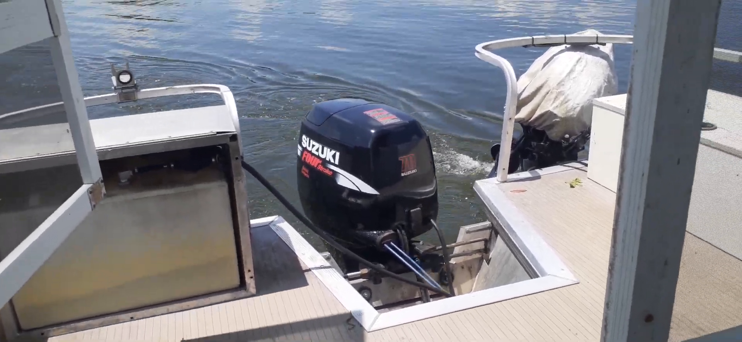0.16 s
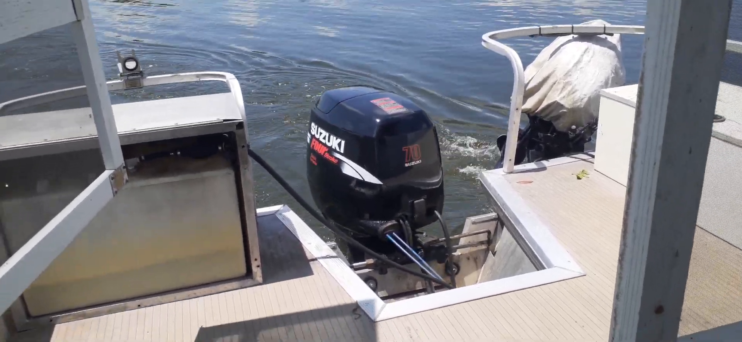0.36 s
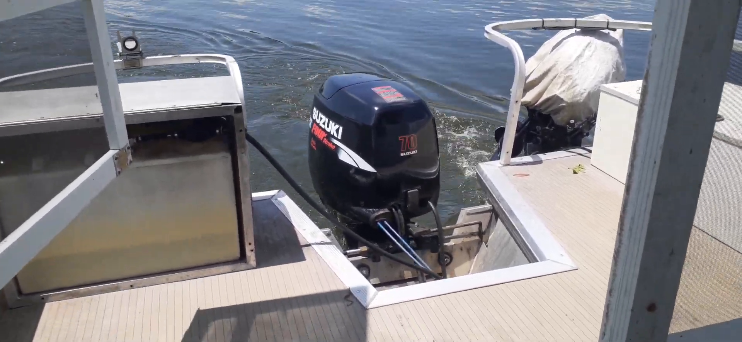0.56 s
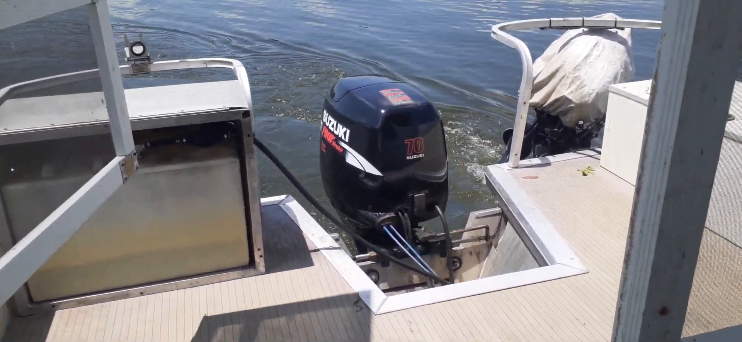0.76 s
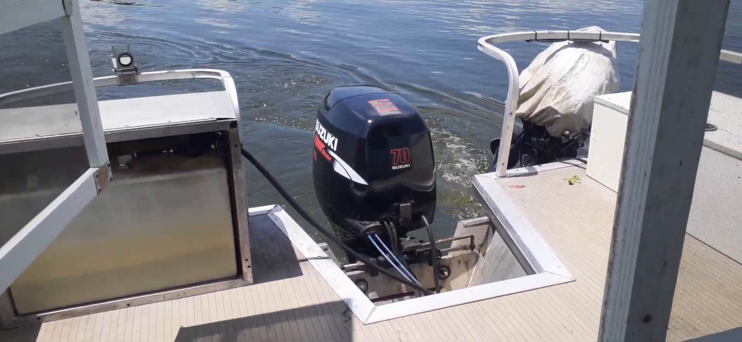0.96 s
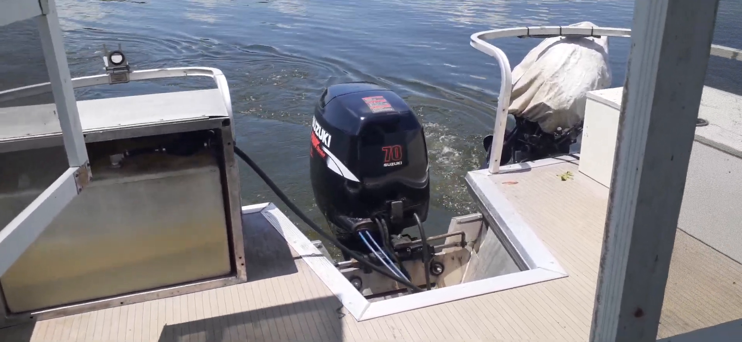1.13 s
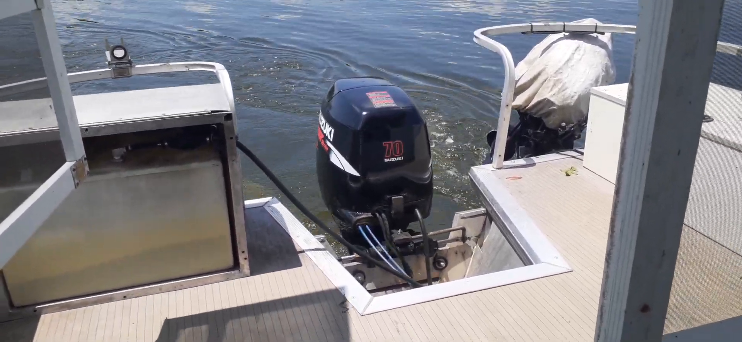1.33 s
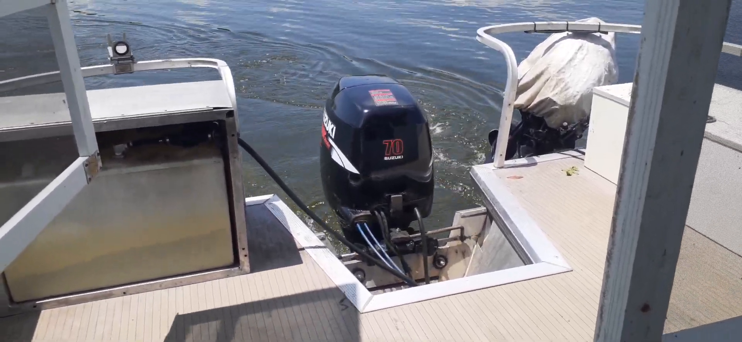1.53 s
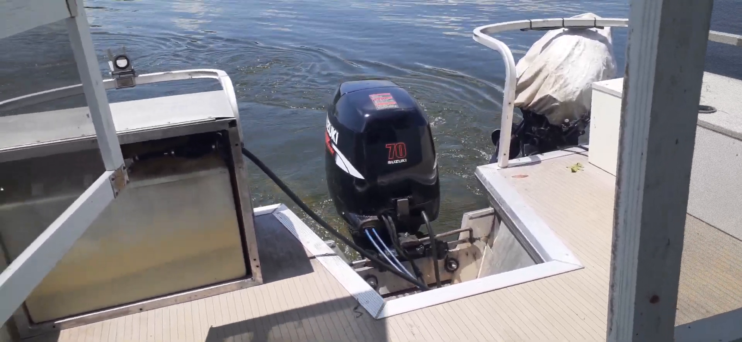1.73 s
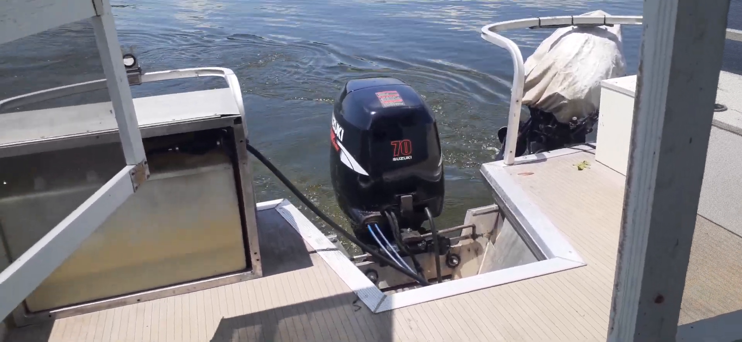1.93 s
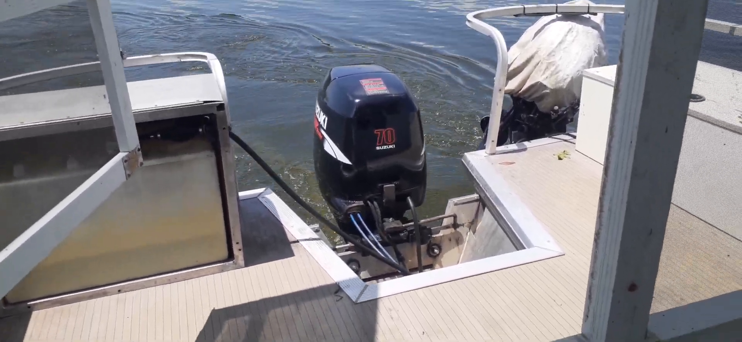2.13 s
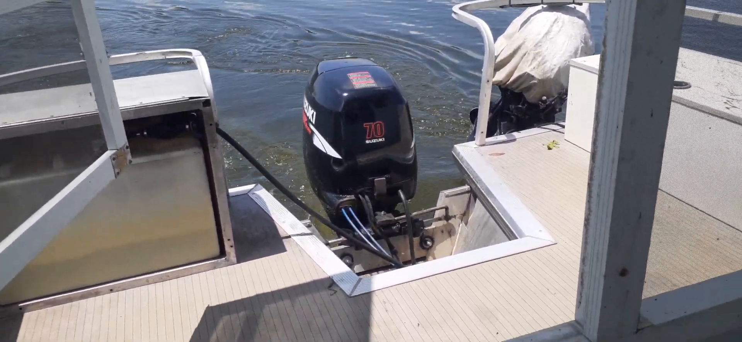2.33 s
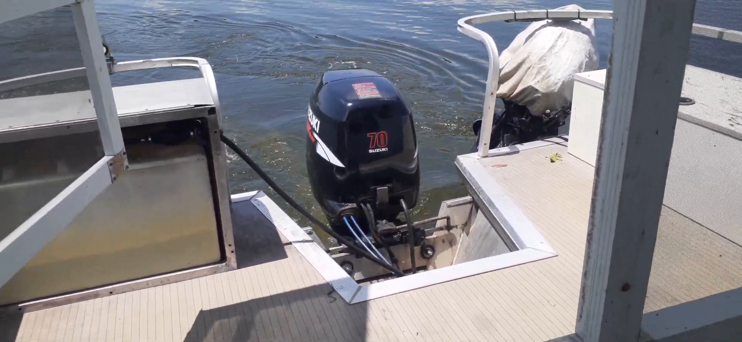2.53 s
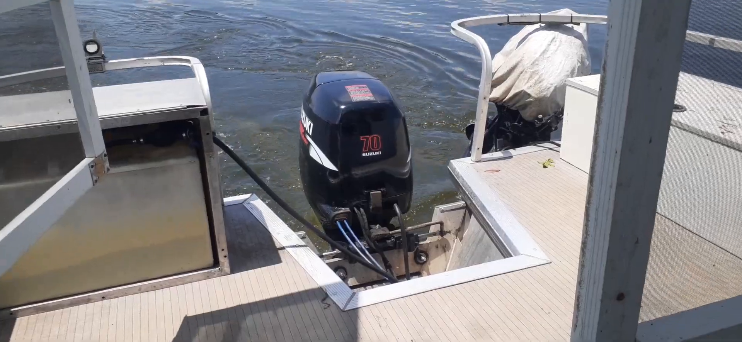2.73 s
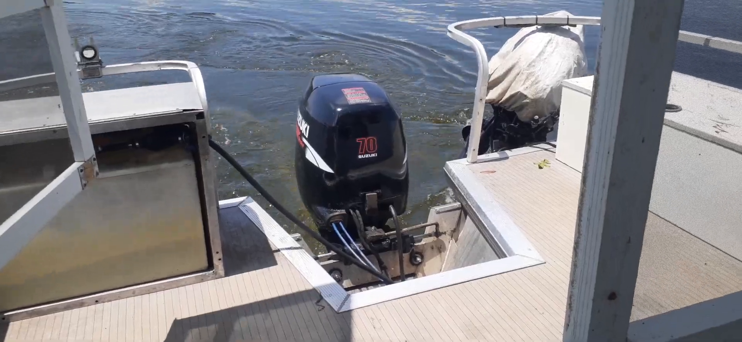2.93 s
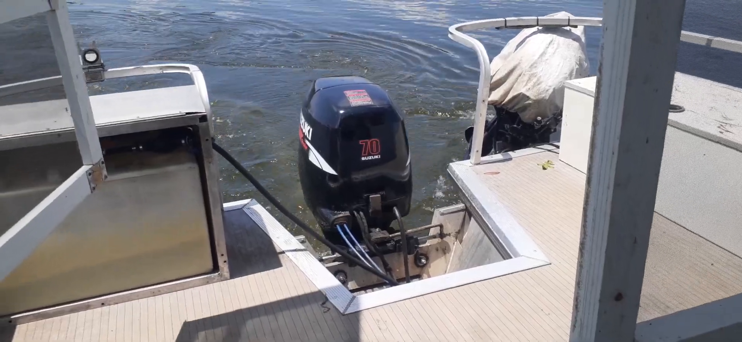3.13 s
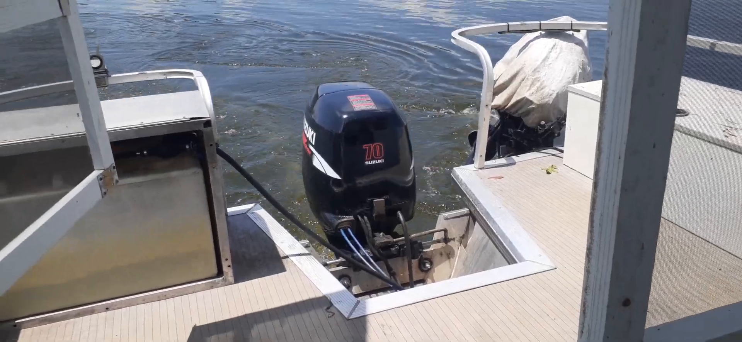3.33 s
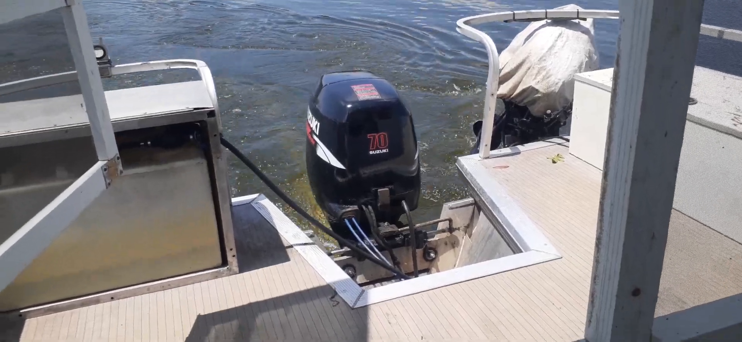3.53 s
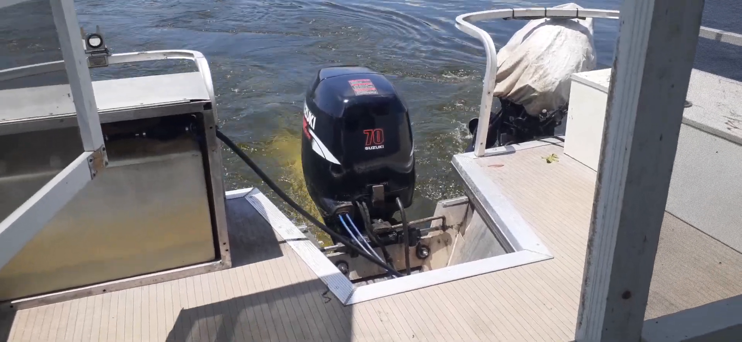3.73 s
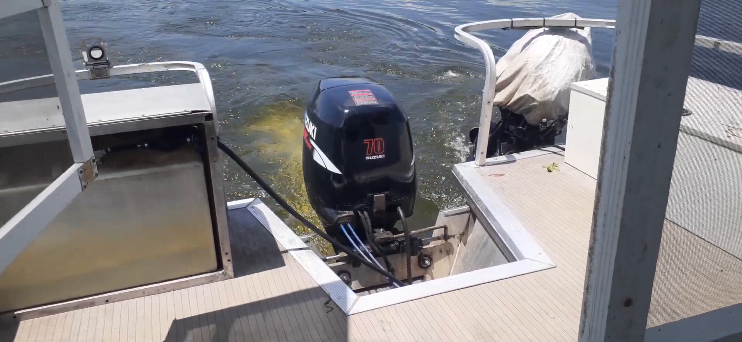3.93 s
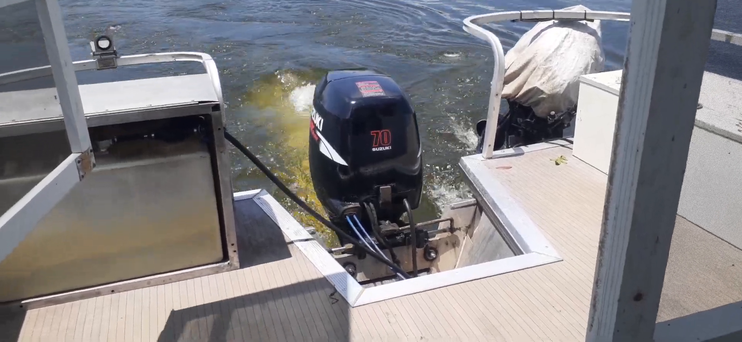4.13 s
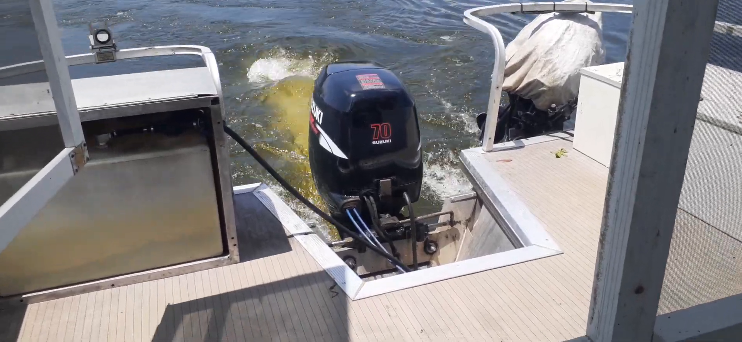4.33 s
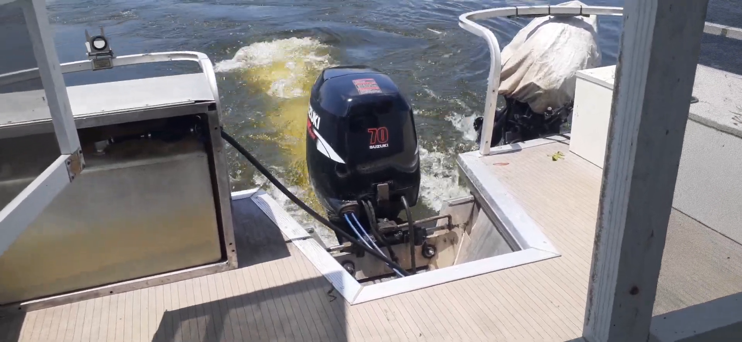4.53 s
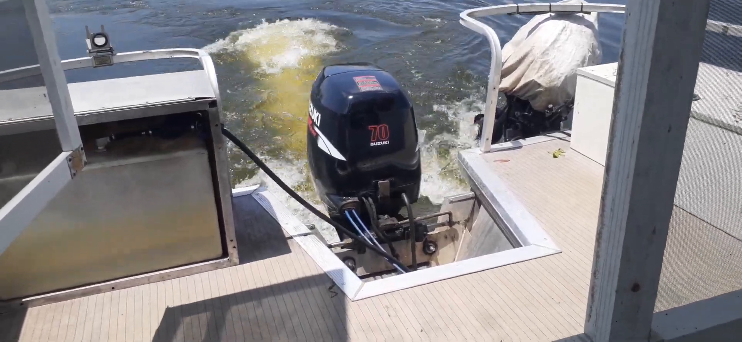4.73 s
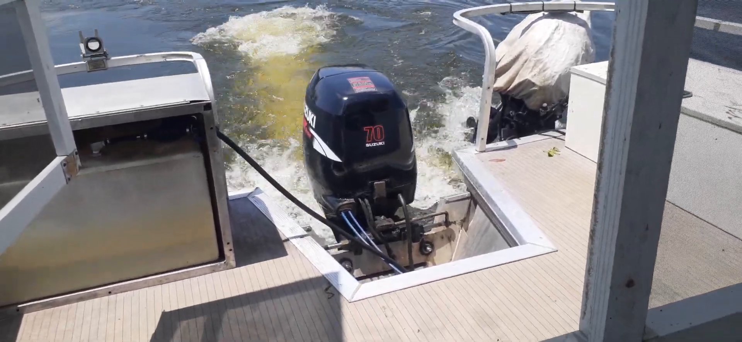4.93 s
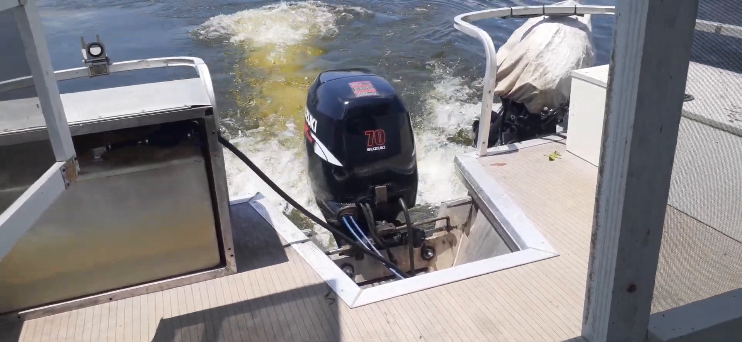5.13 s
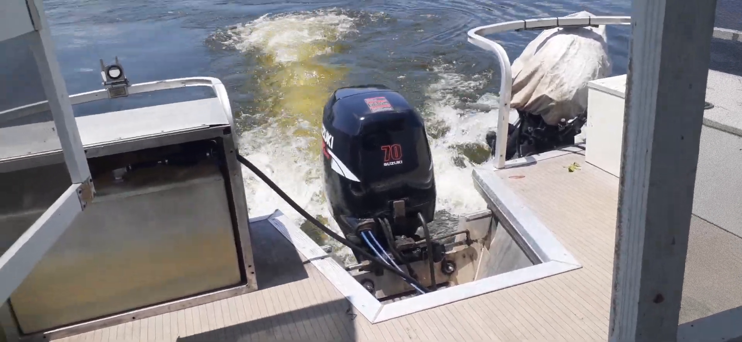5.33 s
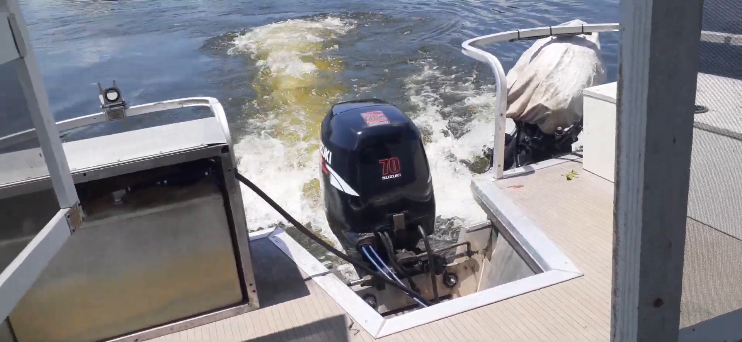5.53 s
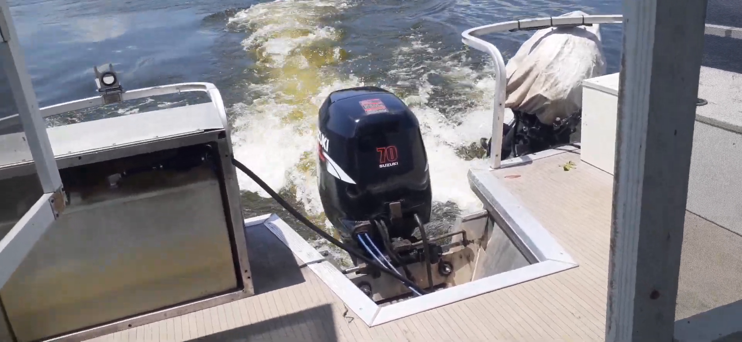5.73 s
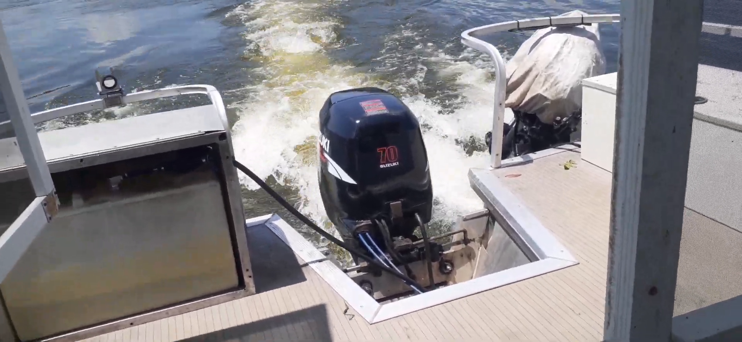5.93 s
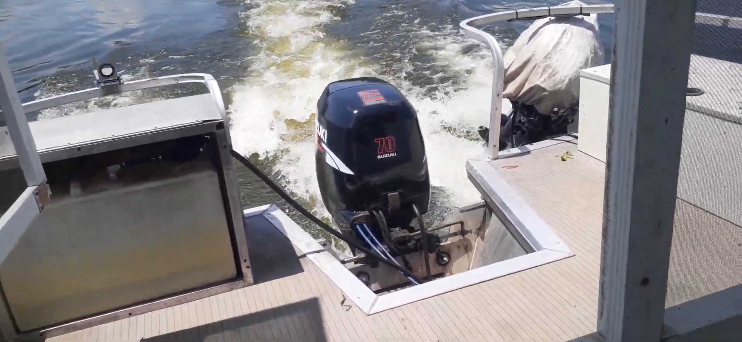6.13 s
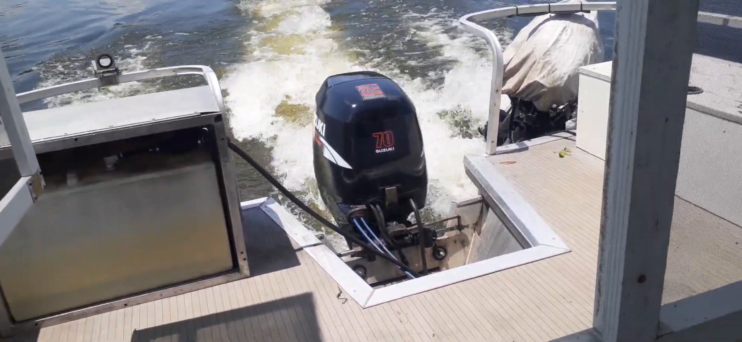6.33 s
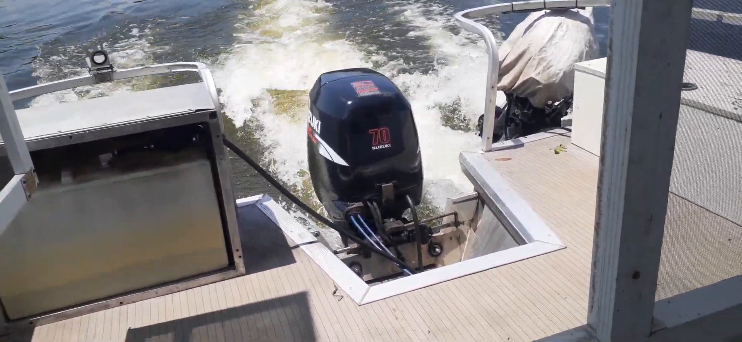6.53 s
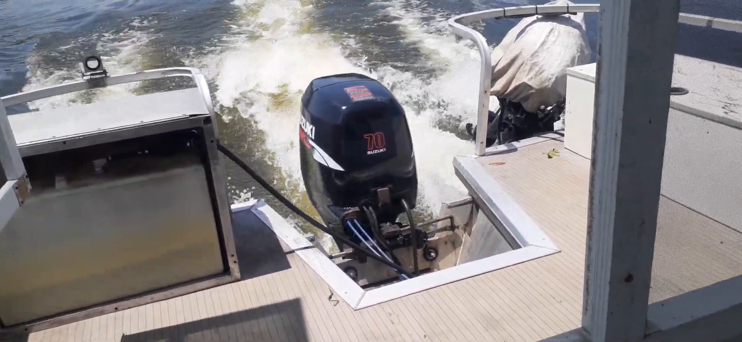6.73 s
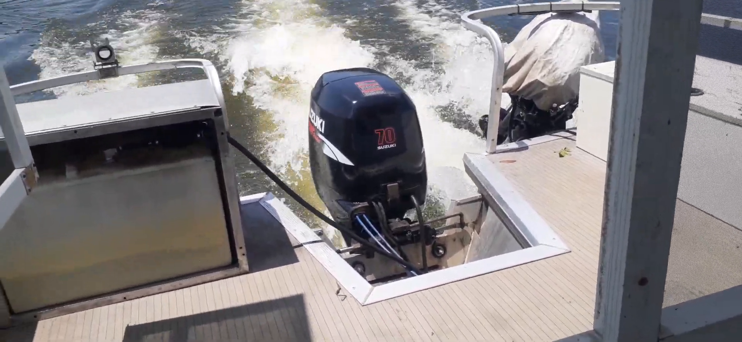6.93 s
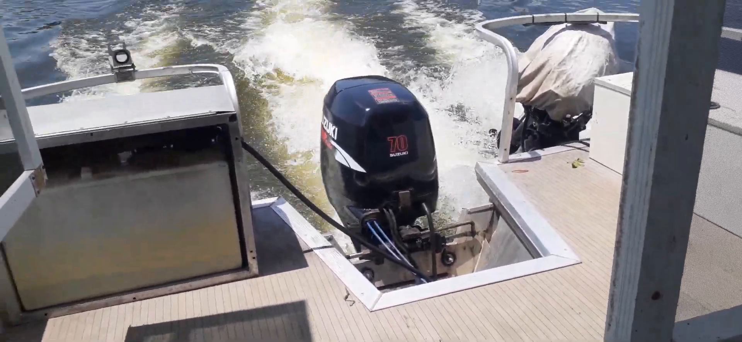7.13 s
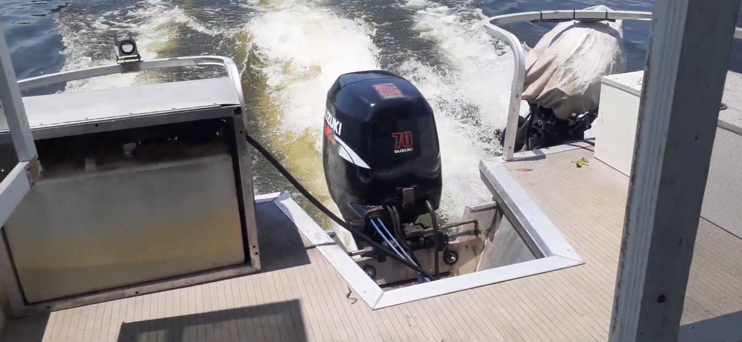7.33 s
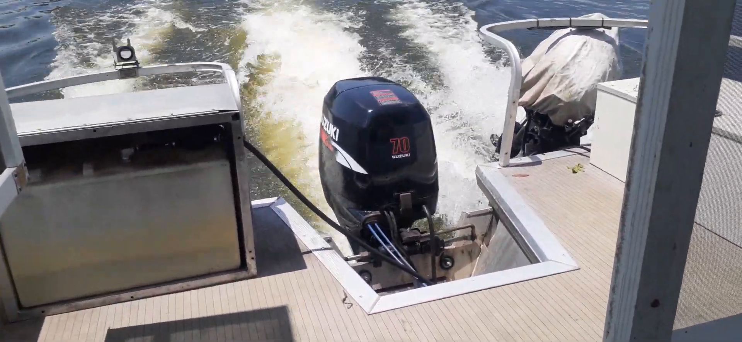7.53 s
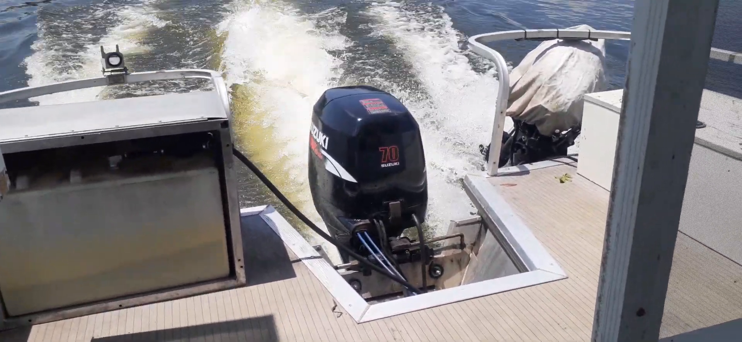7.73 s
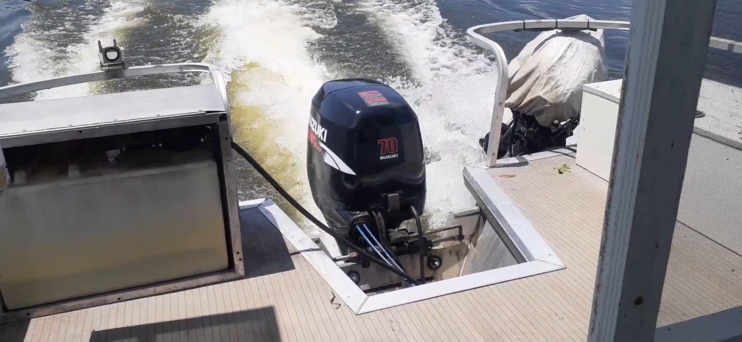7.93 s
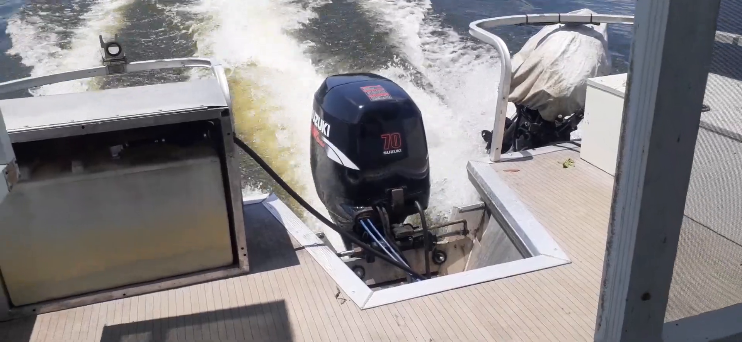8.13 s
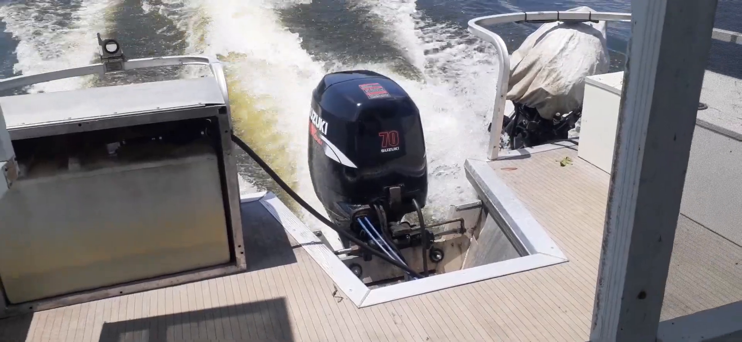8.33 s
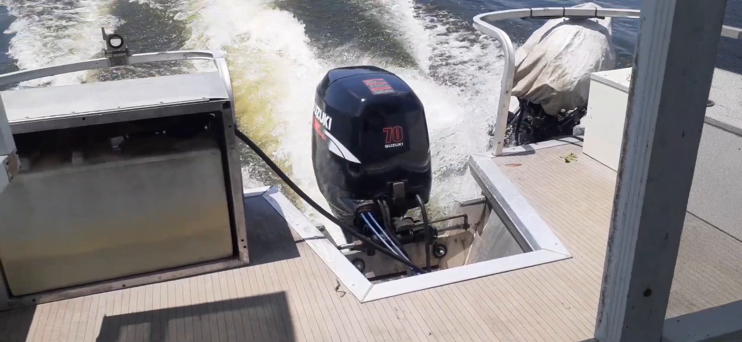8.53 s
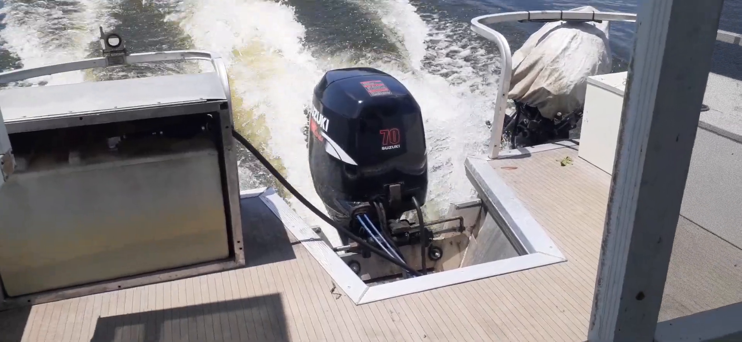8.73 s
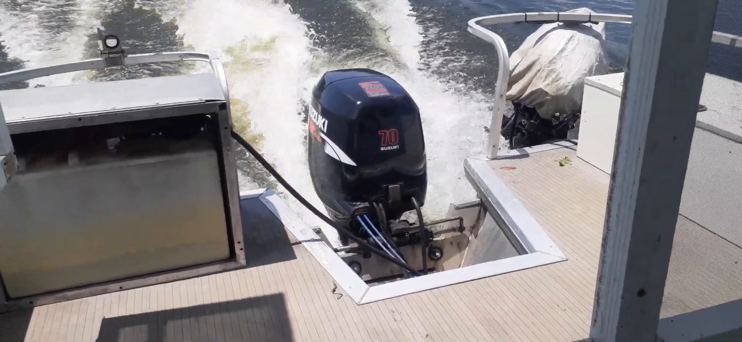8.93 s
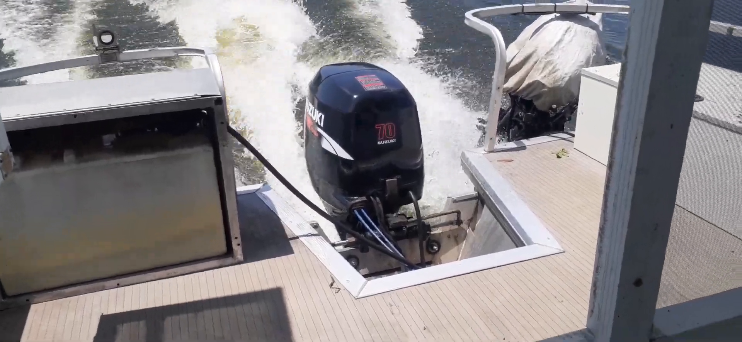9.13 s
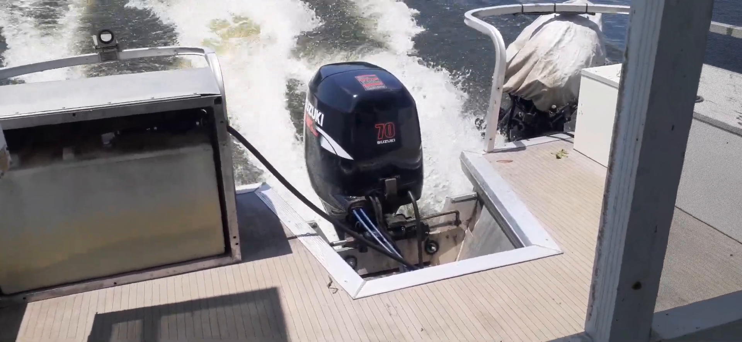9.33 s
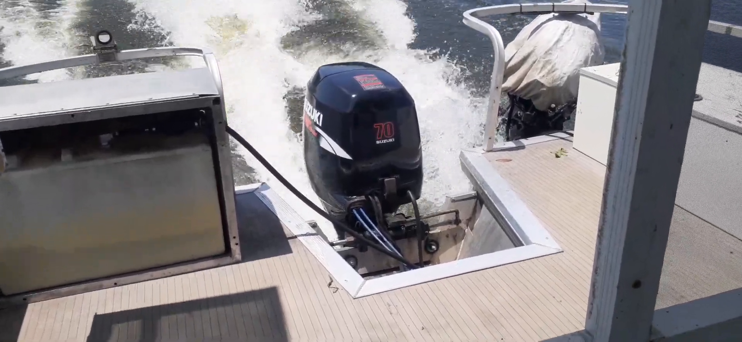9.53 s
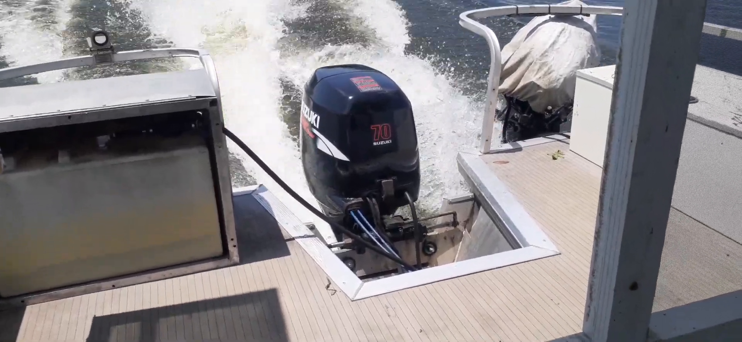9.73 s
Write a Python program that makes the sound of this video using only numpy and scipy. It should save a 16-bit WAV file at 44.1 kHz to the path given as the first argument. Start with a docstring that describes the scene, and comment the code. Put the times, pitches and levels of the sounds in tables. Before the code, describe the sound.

Heard from a boat's deck, a softly chugging outboard opens up and climbs in speed, with rushing water and slaps on the hull.

```python
"""The low chug of a four-cylinder outboard idling, heard from the deck of a metal boat, with a stereo
microphone facing the stern. After three seconds the motor opens up and climbs in speed. The exhaust booms
through water and hull, the block clatters and sizzles under its cowl, and a loose panel buzzes at some
speeds. The wake grows behind the boat and water slaps the hull, over a light rumble of wind."""
import sys
import numpy as np
from scipy import signal
from scipy.fft import rfft, irfft, next_fast_len
from scipy.io import wavfile

SR = 44100
rng = np.random.default_rng(int(sys.argv[2]) if len(sys.argv) > 2 else 0)


def wav_record(signal):
    """Record a signal, one row per channel, as 16-bit PCM in the file named by sys.argv[1]."""
    frames = np.transpose(np.atleast_2d(signal))
    bounded = np.clip(frames, -1, 1)
    # unit amplitude maps onto the largest positive 16-bit level
    quanta = np.round(bounded * 32767).astype(np.int16)
    wavfile.write(sys.argv[1], SR, quanta)


N = 435266

# Resonances of the motor's cowl. Each row: pitch in Hz, nominal width in Hz, level in dB.
COWL_MODES = [(627.6, 37, -2), (775, 65, -1), (894, 81, -2), (1300, 290, -7.5), (1490, 85, -14.5),
              (2310, 310, -17.5), (4040, 660, -17), (7460, 400, -19)]


def from_db(db):
    """Decibels to gain."""
    return np.exp(np.asarray(db) * (np.log(10) / 20))


def rms_one(x):
    """Scales to rms 1."""
    return x / np.sqrt(np.mean(x ** 2) + 1e-20)


def in_time(rows):
    """Rows led by a time in seconds become one curve per further column, a value per sample."""
    seconds, *columns = np.transpose(rows)
    return [np.interp(np.arange(N) / SR, seconds, column) for column in columns]


def at_hz(points, hz):
    """Reads a table on a log-frequency axis."""
    points_hz, values = np.transpose(points)
    return np.interp(np.log(hz), np.log(points_hz), values)


def drift(rate_hz):
    """Slow random wander of rms 1."""
    r = np.exp(-80 * np.pi * rate_hz / SR)
    slow = signal.lfilter([1], [1, -2 * r, r * r], rng.standard_normal(N // 40 + 2002))[2000:]
    return np.interp(np.arange(N) / 40, np.arange(len(slow)), rms_one(slow))


def resonate(x, hz, width):
    """Two-pole resonance, gain 1 at its peak."""
    r = np.exp(-np.pi * width / SR)
    feedback = [1, -2 * r * np.cos(2 * np.pi * hz / SR), r * r]
    return signal.lfilter((1 - r * r) / 2 * np.array([1, 0, -1]), feedback, x)


def resonate_twice(x, hz, width):
    """Two passes through one resonance, for steeper flanks."""
    return resonate(resonate(x, hz, width), hz, width)


def body(drive, modes):
    """A shaken structure: steep resonances in parallel, signs alternating; rms 1."""
    return rms_one(sum((-1) ** k * from_db(db) * rms_one(resonate_twice(drive, hz, 1.17 * width))
                       for k, (hz, width, db) in enumerate(modes)))


def spread(mid, side, hz):
    """Left and right at rms 1: low sounds sit in the centre, high ones wide."""
    return rms_one(mid + np.clip(hz / 4000, 0, 1) * side * [[1], [-1]])


def banded_noise(spectrum, pan, flicker_db):
    """Third-octave bands of stereo noise, each with its own level, flicker, side and width; rms 1."""
    # How alike the microphone's sides are. Each row: frequency in Hz, correlation from 0 to 1.
    likeness = [(150, 1), (300, 0.85), (550, 0.8), (950, 0.69), (1500, 0.1), (2400, 0.11), (6000, 0.09),
                (15000, 0.09)]
    out, shared_flicker = np.zeros((2, N)), drift(5.0)
    edges_hz = 160 * 2 ** np.arange(0, 6.9, 1 / 3)
    white = rng.standard_normal((2, 2, N))
    for k, (low, high) in enumerate(zip(edges_hz, edges_hz[1:])):
        band = signal.butter(2, [low, high], "band", fs=SR, output="sos")
        mid, side = signal.sosfilt(band, white[k % 2])
        hz = np.sqrt(low * high)
        alike = np.clip(at_hz(likeness, hz), 0, 1)
        gain = from_db(at_hz(spectrum, hz) + flicker_db * (0.46 * shared_flicker + drift(17.0)))
        balance = from_db(at_hz(pan, hz) / 2 * np.array([[1], [-1]]))
        mid, side = gain * np.sqrt(1 + alike) * mid, gain * np.sqrt(1 - alike) * side
        out += balance * [mid + side, mid - side]
    return rms_one(out)


def firing_clicks(firings, uneven_db):
    """One click per firing, its strength set by cylinder and by chance."""
    # Each entry: one cylinder's strength in dB.
    cylinder_db = [-1.5, 1.5, -2.5, 0]
    count = np.floor(firings).astype(int)
    chance_db = uneven_db * rng.standard_normal(count[-1] + 1)[count]
    return np.diff(count, prepend=0) * from_db(np.take(cylinder_db, count % 4) + chance_db)


def firing_swell(firings, depth):
    """A gain that jumps at each firing, then dies away."""
    return 1 - depth + depth * 2.4 * np.exp(-2.5 * (firings % 1))


def wind():
    """Light, lumpy wind rumble, different on each side of the microphone."""
    band = signal.butter(2, [25, 90], "band", fs=SR, output="sos")
    rumble = signal.sosfilt(band, rng.standard_normal((2, N)))
    return from_db(-50 + 5.0 * drift(1.2)) * rms_one(rumble)


def thin_tones():
    """Thin tones swell and fade in the background: noise through narrow resonances."""
    # Each row: start and end in seconds, pitch in Hz, nominal width in Hz, level in dB.
    tones = [(0.125, 0.34, 4300, 40, -58), (0.498, 1.35, 3590, 61, -59.5), (2.6, 3.15, 4540, 50, -58.5),
             (1.3, 1.8, 11960, 121, -48.5), (1.85, 3.1, 11900, 89.5, -56), (3.101, 3.24, 796, 30, -42),
             (3.287, 3.4, 903, 37, -42), (3.334, 3.44, 1298, 46, -43), (3.39, 3.48, 534, 29.9, -34.5),
             (4.997, 5.7, 10100, 69.95, -62), (6.3, 9.2, 11830, 60, -55), (6.75, 7.8, 1100, 36, -44.5),
             (7.403, 8.1, 2447, 65, -53)]
    # Eight fainter, high ones come and go by chance during the idle.
    faint = [(2 * a, 2 * a + .4 + b, 9700 + 2800 * c, 80, -63) for a, b, c in rng.random((8, 3))]
    out = np.zeros((2, N))
    for start, end, hz, width, level_db in tones + faint:
        i, j = round(start * SR), round(end * SR)
        mid, side = resonate_twice(rng.standard_normal((2, j - i)), hz, width)
        swell = np.sin(np.linspace(0, np.pi, j - i)).clip(0) ** 0.23
        out[:, i:j] += from_db(level_db) * spread(mid, side, hz) * swell
    return out


def gurgle(wake_db):
    """Air pockets in the wake burst in clumps and ring for a few cycles."""
    sizes = from_db(2.3 * np.minimum(rng.exponential(1, N), 5)) * rng.choice([-1, 1], N)
    bursts = rng.random(N) < 400 * from_db(5.0 * drift(5.0)) / SR
    pitches_hz, pitch_index = np.geomspace(230, 1500, 14), rng.integers(0, 14, N)
    pops = sum(resonate(sizes * bursts * (pitch_index == k) + 1e-18, hz, hz / 4.7) * (500 / hz) ** 0.96
               for k, hz in enumerate(pitches_hz))
    return from_db(wake_db - 12.0) * rms_one(pops)


def wake(firing_hz):
    """Water churns and gurgles astern; the fine spray comes up fully only at speed."""
    # Each row: time in seconds, level in dB.
    levels = [(0, -44.5), (2, -47.5), (3.1, -44.5), (3.45, -33), (4, -31.5), (4.7, -32.5), (5.8, -27.5),
              (6.6, -29.5), (8, -28.5), (9.87, -27)]
    # Each row: frequency in Hz, relative spectral density in dB.
    spectrum = [(200, 3), (300, 0.5), (600, -1.5), (1000, -4), (1700, -14.5), (2500, -18), (4000, -22),
                (7000, -22.5), (10000, -25), (15800, -22.5)]
    # Each row: frequency in Hz, left minus right in dB.
    pan = [(60, -12), (180, 6.5), (550, 1.5), (1650, 4), (4970, 0), (15000, 2)]
    wake_db, = in_time(levels)
    churn = banded_noise(spectrum, pan, flicker_db=1.0)
    spray = churn - signal.sosfilt(signal.butter(1, 5000, fs=SR, output="sos"), churn)
    spray_cut = 0.35 * np.clip((127 - firing_hz) / 12, 0, 1)
    return from_db(wake_db) * (churn - spray_cut * spray) + gurgle(wake_db)


def ticks_and_slaps():
    """Ticks on the motor are short puffs of noise; slaps of water on the hull last longer and knock."""
    # Each row: start in seconds, level in dB, pitch in Hz.
    hits = [(0.31, -24, 5000), (1.195, -35, 10980), (6.427, -19, 390), (7.009, -21, 440),
            (7.063, -15.5, 402), (7.356, -26, 365.3), (7.381, -19, 594), (7.605, -15, 643),
            (8.397, -24, 345), (8.493, -21, 411), (8.701, -22, 310), (9.188, -22, 320),
            (9.4425, -14.5, 631), (9.448, -22, 900), (9.485, -14.5, 1234), (9.515, -18.5, 690)]
    out, t = np.zeros((2, N)), np.arange(3000) / SR
    for start, level_db, hz in hits:
        width = np.maximum(0.11 * hz, hz ** 2 / 5000)
        mid, side = resonate(rng.standard_normal((2, len(t))), hz, width)
        puff = spread(mid, side, hz) * np.exp(-t / (0.0082 + 3.1 / hz))
        knock = np.clip(1 - hz / 4000, 0, 1) * np.sin(2 * np.pi * hz * t) * np.exp(-t * hz / 2.0)
        i = round(start * SR)
        out[:, i:i + len(t)] += from_db(level_db) * (1.45 * knock + 0.18 * puff)
    return out


def panel_buzz(firings):
    """In four set spells a loose panel on board taps once per firing and rasps in between."""
    # Each row: start, loudest moment and end in seconds, rasp at its loudest and at the end in dB,
    # tilt of the rasp in dB per octave, taps at their loudest in dB.
    spells = [(3.115, 3.36, 3.46, -45, -48, 9, -41), (3.562, 3.68, 3.98, -26.5, -32.5, -5, -26),
              (4.951, 5.1, 5.26, -34.5, -38.5, -5.5, -32.5), (6.079, 6.161, 6.32, -35, -37, 2.5, -58)]
    # Each row: pitch in Hz, nominal width in Hz, level in dB.
    panel_modes = [(336, 34, 7), (414, 35, -1), (641, 34, -2.5), (834, 19, -1), (1090, 75, -2.5)]
    out, t = np.zeros((2, N)), np.arange(N) / SR
    pulsing_noise = firing_swell(firings, depth=0.2) * rng.standard_normal((2, N))
    clicks = firing_clicks(firings, uneven_db=4.0)
    for start, loudest, end, top_db, end_db, tilt_db, taps_db in spells:
        i, j = round((start - .1) * SR), round((end + .1) * SR)
        hz = np.maximum(np.fft.rfftfreq(j - i, 1 / SR), 900)
        rasp = irfft(rfft(pulsing_noise[:, i:j]) * from_db(tilt_db * np.log2(hz / 1000)), j - i)
        taps = from_db(taps_db - top_db) * body(clicks[i:j], panel_modes)
        swell = np.interp(t[i:j], [start - .03, start + 0.026, loudest, end - .01, end + 0.014],
                          from_db([-200, top_db - 4.0, top_db, end_db, -200]))
        out[:, i:j] += swell * (rms_one(rasp) + taps)
    return signal.sosfilt(signal.butter(2, 260, "high", fs=SR, output="sos"), out)


def sizzle(firing_hz, sizzle_db):
    """Soft, high sizzle from under the cowl, a little to the left; its centre shifts with speed."""
    # Each row: centre in Hz, nominal width in Hz, then relative level in dB at each of three speeds.
    bands = [(10400, 500, -5.5, -12, -26), (11170, 440, -10, 1, -9), (11870, 770, 0, -12, -10),
             (12350, 370, -3.5, -11, -2.5)]
    # Those three speeds, in firings per second.
    speeds_hz = [36, 118.8, 131.4]
    out = 0
    for hz, width, *by_speed_db in bands:
        band = rms_one(resonate_twice(rng.standard_normal((2, N)), hz, width))
        out = out + from_db(np.interp(firing_hz, speeds_hz, by_speed_db) + 1.2 * drift(2.5)) * band
    return from_db(sizzle_db) * from_db([[1.5], [-1.5]]) * out


def housing_whine(firings, firing_hz):
    """The twelfth multiple of the firing rate sings while it crosses a housing resonance."""
    in_tune = 1 / (1 + ((12 * firing_hz - 1665) / 30) ** 2)
    gain = from_db(-49.0 + 1.72 * drift(5.9)) * in_tune
    return gain * np.sin(2 * np.pi * 12 * firings + 0.78 * drift(2.9))


def cowl_growl(firings, firing_hz, growl_db):
    """Firings ring the cowl, just left of centre: a multiple stands out as it passes a resonance."""
    kicks = firing_clicks(firings, uneven_db=2.0) * np.sqrt(SR / firing_hz)
    return from_db(growl_db) * body(kicks, COWL_MODES[:4]) * from_db([[1.0], [-1.0]])


def valve_clatter(firings, clatter_db):
    """Valve gear and chain: noise swelling at each firing, with the cowl ringing along."""
    # Each row: frequency in Hz, relative spectral density in dB.
    spectrum = [(200, 8.5), (300, 8), (500, 1.5), (800, -3.5), (1100, -2), (1500, -8), (2000, -20.5),
                (3500, -15), (6000, -18), (9000, -17.5), (12000, -12), (15800, -25)]
    # Each row: frequency in Hz, left minus right in dB.
    pan = [(60, 0.5), (180, 0.5), (550, 1.8), (1650, 7.6), (4970, 0.33), (15000, 1.5)]
    cowl = sum(from_db(db) * rms_one(resonate_twice(rng.standard_normal(N), hz, 1.37 * width))
               for hz, width, db in COWL_MODES)
    clatter = banded_noise(spectrum, pan, flicker_db=2.0) + from_db([[-7], [-9]]) * cowl
    return from_db(clatter_db) * firing_swell(firings, depth=0.13) * clatter


def hull_and_deck(firings, firing_hz, throb_db, drum_db):
    """Firings and churned water, calmer at idle, make the hull throb and the deck drum underfoot."""
    # Each row, in both: pitch in Hz, nominal width in Hz, level in dB.
    hull_modes = [(46, 46, -27), (70.2, 17, -4), (104.2, 18, -7), (130.2, 37, -9)]
    deck_modes = [(165.6, 23, 0.5), (215, 29.5, 4), (350, 29, -18), (390, 42, -2), (448.6, 15, -1.5)]
    kicks = firing_clicks(firings, uneven_db=1.0) * np.sqrt(SR / firing_hz)
    water = np.interp(firing_hz, [35, 60], [0.4, 1.1]) * rng.standard_normal(N)
    drive = 0.56 * kicks + water
    throb = from_db(throb_db) * body(drive, hull_modes)
    drumming = from_db(drum_db + 0.4 * drift(2.1)) * body(drive, deck_modes)
    return throb + drumming


def exhaust(firings, firing_hz, boom_db):
    """A boom at the firing rate, with overtones; at idle strong and weak firings alternate and chug."""
    # The boom dips briefly. Each row: time in seconds, depth in dB.
    dips = [(4.519, 4), (5.334, 20), (7.856, 4), (8.132, 4), (8.21, 4.5), (8.34, 3), (8.51, 4.5), (8.6, 5),
            (8.81, 3.5), (9.13, 1), (9.22, 2)]
    # Each row: multiple of the firing rate, idle level in dB, firing rate in Hz up to which that holds,
    # level under load in dB, flutter under load in dB.
    overtones = [(2, -33, 40, -37, 2.5), (3, -36, 40, -44.5, 2), (4, -43, 38, -52.5, 3.5),
                 (6, -37, 68, -55, 1.5), (7, -59, 40, -58.5, 1.5)]
    # The boat's resonances lift a loaded overtone. Each row: centre in Hz, width in Hz, lift in dB.
    lifts = [(92, 12, 13), (164.4, 7.4, 5), (223.3, 4.4, 12.5), (246.7, 19.9, 5), (299.4, 25, 4.5),
             (326.5, 12, 10.5), (404, 21, 8.5), (440, 29, 11), (633.4, 67, 21), (696, 20, 10),
             (795, 51.6, 12), (890, 44.6, 19)]
    t, speeds_hz = np.arange(N) / SR, np.arange(30., 160)
    idle = np.clip((60 - firing_hz) / 25, 0, 1)
    chug_db = idle * (2.0 * np.cos(np.pi * firings + 1.6 * drift(2.4)) + np.cos(np.pi * firings / 2))
    dip_db = sum(np.interp(t, [s - 0.028, s, s + 0.028], [0, db, 0]) for s, db in dips)
    partials = [(1, boom_db - dip_db)]
    for multiple, idle_db, holds_hz, load_db, flutter_db in overtones:
        load = np.clip((firing_hz - holds_hz) / 7.0, 0, 1)
        lift_db = sum(db / (1 + (2 * (multiple * speeds_hz - hz) / width) ** 2)
                      for hz, width, db in lifts)
        loaded_db = load_db + np.interp(firing_hz, speeds_hz, lift_db) + flutter_db * drift(3.73)
        partials.append((multiple, idle_db + load * (loaded_db - idle_db)))
    out = 0
    for multiple, level_db in partials:
        waver_db = (0.5 * min(multiple, 4) + 1.3 * idle) * drift(14.0)
        phase_slip = (0.11 * multiple + 0.33 * idle) * drift(9.3)
        tone = np.sqrt(2) * np.sin(2 * np.pi * multiple * firings + phase_slip)
        out = out + from_db(level_db + waver_db + chug_db) * tone
    return out


def scene():
    """From the deck: the motor near the middle, water and wind around it."""
    # Each row: time in seconds, firing rate in Hz, level of the exhaust boom in dB.
    motor_run = [(0.0, 34.28, -54), (1.5, 33.93, -64), (3.0, 34.92, -45), (3.1, 38.22, -37),
                 (3.21, 48.54, -22), (3.34, 62.4, -35), (3.39, 66.77, -18), (3.47, 75.15, -10),
                 (3.6, 82.2, -11), (3.72, 82.05, -14), (3.9, 83.9, -13.5), (4.05, 95.7, -10.5),
                 (4.18, 103.9, -10.5), (4.32, 108.0, -14.5), (4.8, 111.9, -16), (4.92, 113.3, -25),
                 (5.28, 119.5, -21.5), (5.53, 121.7, -15), (5.92, 126.4, -16), (6.04, 127.6, -11),
                 (6.45, 129.5, -14), (6.62, 130.9, -12), (7.17, 133.2, -11.5), (7.28, 134.7, -14.5),
                 (8.0, 137.2, -13), (8.55, 138.8, -11), (8.7, 140.2, -9.5), (8.86, 140.2, -14),
                 (9.27, 141.7, -14.5), (9.47, 146.5, -12), (9.66, 150.6, -9), (9.87, 153.2, -13)]
    # Each row: firing rate in Hz, then hull throb, deck drumming, growl, clatter and sizzle in dB.
    levels_by_speed = [(34, -33.5, -44.5, -51, -37, -52.5), (48.04, -27, -43, -41, -34, -57),
                       (68, -32.5, -32, -57, -32.5, -58), (83.4, -34, -42, -45, -41.5, -64),
                       (108, -38, -36.5, -55, -47, -58), (116.25, -30, -36, -57, -40, -52),
                       (121.15, -30, -37, -48, -49, -51), (126.6, -30, -38.5, -48, -42, -45),
                       (132, -33, -31, -37.5, -39.5, -51), (138, -31, -32.5, -40.5, -38, -49.5),
                       (145.66, -31, -32.5, -29.5, -58, -54), (151.2, -27, -35.5, -47, -48, -59)]
    # Each row: time in seconds, left minus right in dB.
    bass_pan = [(0.0, 0), (3.82, 0), (4.12, 1), (4.73, 0.5), (5.09, 6.5), (5.39, -2.5), (7.04, 0.5),
                (8.05, -1.5), (9.87, -1)]
    firing_hz, boom_db = in_time(motor_run)
    firings = np.cumsum(firing_hz) / SR   # running count, rising by 1 per firing
    speeds_hz, *columns = np.transpose(levels_by_speed)
    throb_db, drum_db, growl_db, clatter_db, sizzle_db = [
        np.interp(firing_hz, speeds_hz, column) for column in columns]
    bass = exhaust(firings, firing_hz, boom_db) + hull_and_deck(firings, firing_hz, throb_db, drum_db)
    # The bass reaches the microphone's sides a little apart in level and time as the boat rocks.
    late_bass = (0.05 + 0.039 * drift(2.0)) * np.roll(bass, 80)
    pan_db, = in_time(bass_pan)
    bass = bass * from_db(pan_db / 2 * [[1], [-1]]) + late_bass * [[1], [-1]]
    block = cowl_growl(firings, firing_hz, growl_db) + valve_clatter(firings, clatter_db)
    block += housing_whine(firings, firing_hz)
    return (bass + block + wake(firing_hz) + sizzle(firing_hz, sizzle_db) + panel_buzz(firings)
            + ticks_and_slaps() + thin_tones() + wind())


def record(dry):
    """The microphone in its housing lifts the upper mids; the deepest bass and the very top are cut."""
    # Each row: frequency in Hz, gain in dB.
    response = [(1000, -0.5), (1550, 5), (1850, 4.5), (2600, 7.5), (3200, 3), (4500, 3.6), (5200, 2.6),
                (7400, 2), (8800, -2), (11800, 0.5), (13800, -0.5), (15800, -1)]
    size = next_fast_len(N)
    colour = from_db(at_hz(response, np.fft.rfftfreq(size, 1 / SR) + 1))
    x = irfft(rfft(dry, size) * colour, size)[:, :N]
    x = signal.sosfilt(signal.butter(2, 35, "high", fs=SR, output="sos"), x)
    return signal.sosfilt(signal.ellip(14, .2, 85, 15700, fs=SR, output="sos"), x)


dry = scene()
out = record(dry)
wav_record(out)
```